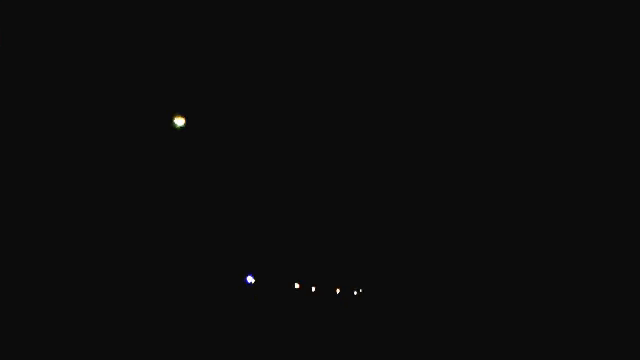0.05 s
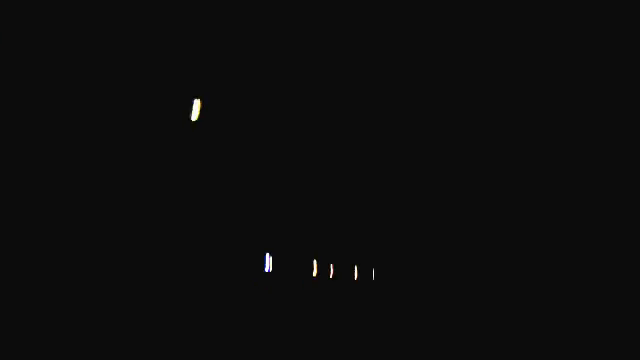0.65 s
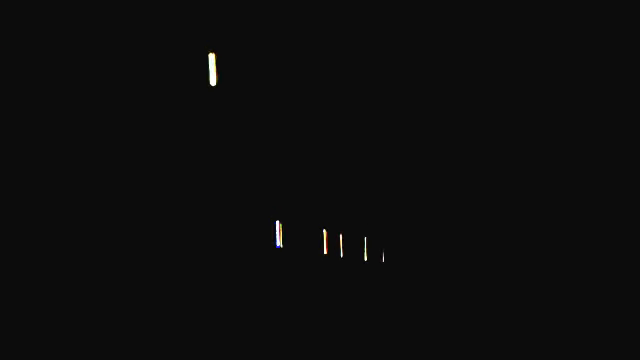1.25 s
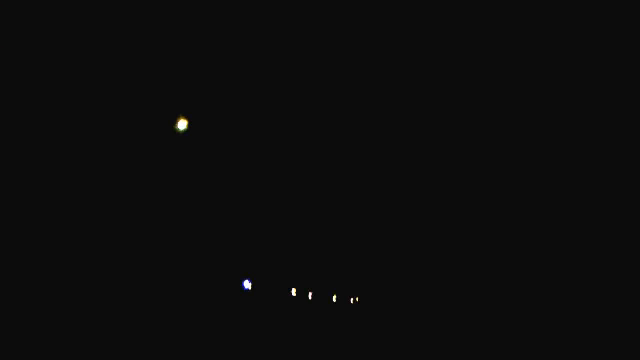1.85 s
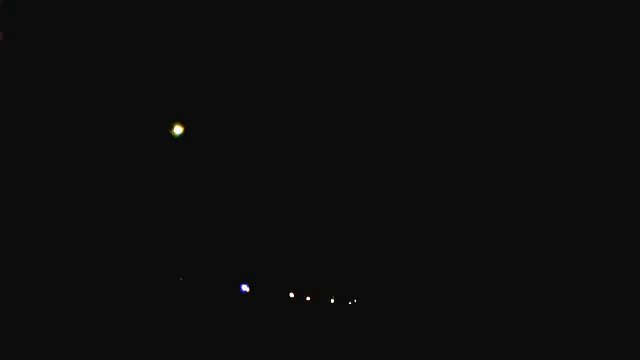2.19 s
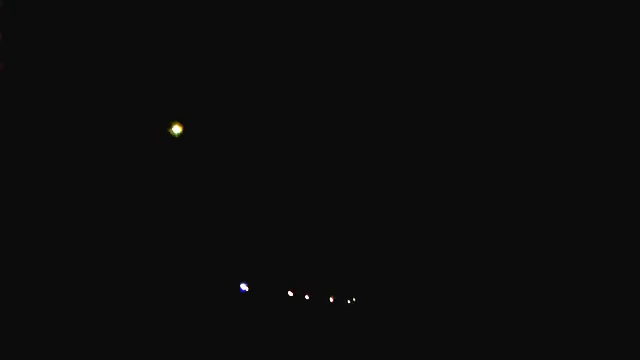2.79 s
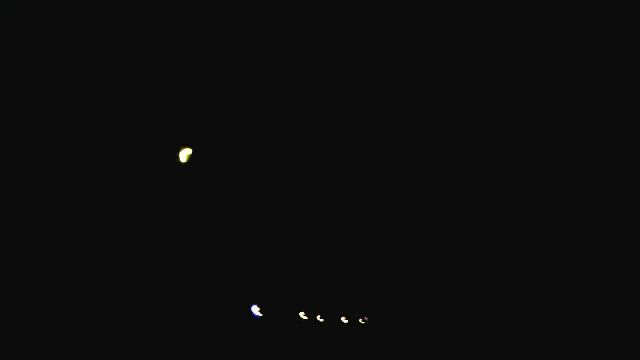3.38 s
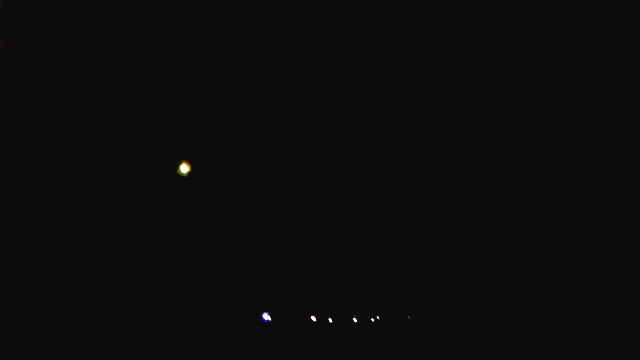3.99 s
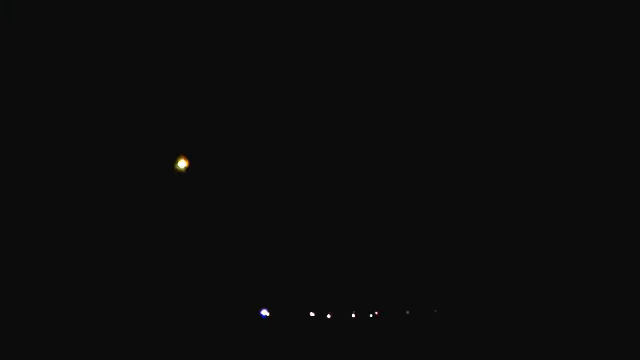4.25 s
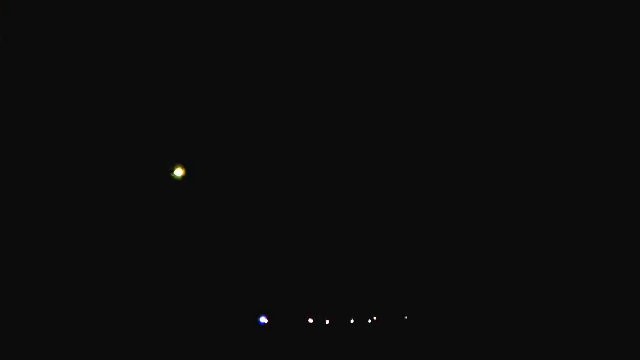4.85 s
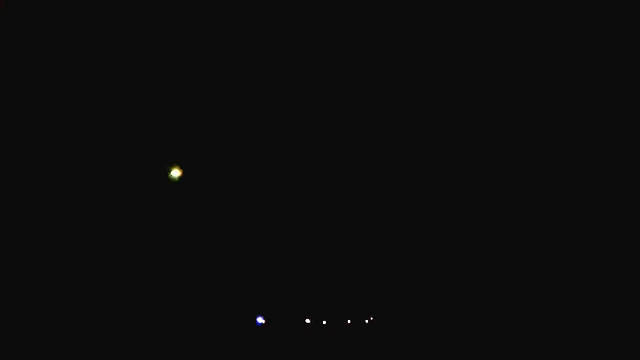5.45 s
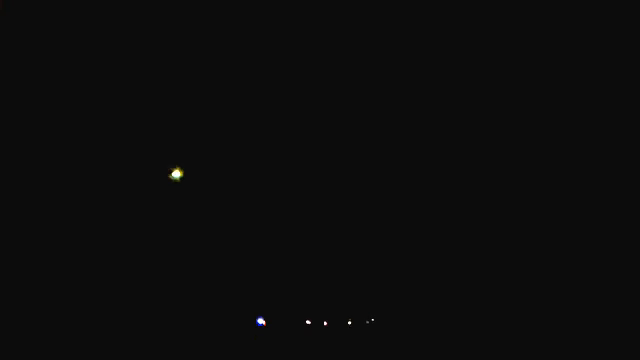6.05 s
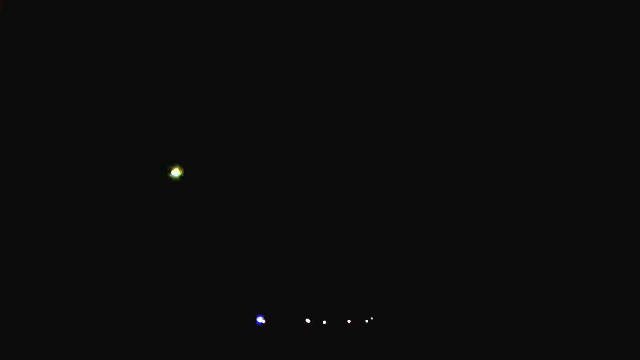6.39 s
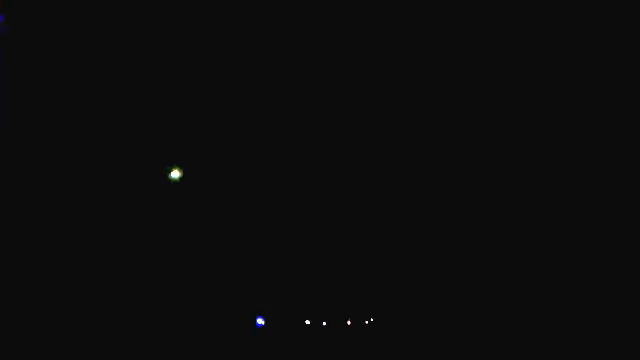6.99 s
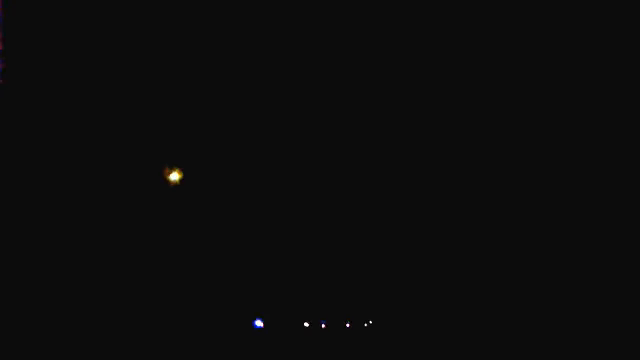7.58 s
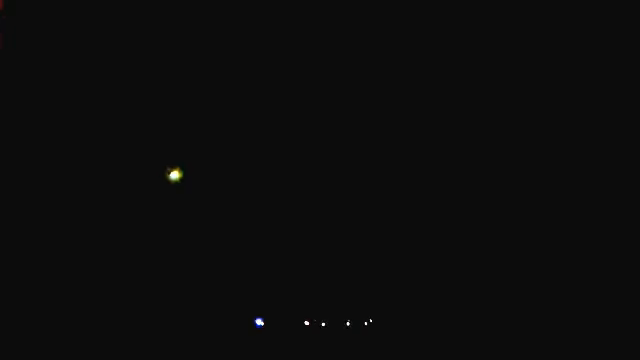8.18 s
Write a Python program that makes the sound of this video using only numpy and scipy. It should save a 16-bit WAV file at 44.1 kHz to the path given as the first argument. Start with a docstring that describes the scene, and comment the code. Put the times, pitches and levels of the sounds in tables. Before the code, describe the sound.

A distant cannon fires two quick rounds at night, with sharp cracks, booms and long rolling echoes, after some microphone handling knocks.

```python
"""Distant cannon at night

A cannon fires two quick rounds over a town, heard through a hand-held camera that knocks and rustles.
The sharp shock cracks of the flying shells arrive first, then the two blasts from the muzzle, then the
shells bursting far away. Walls and hills send the pair back again and again in a long roll.
Under it all, air rumbles on the microphone with a faint hiss."""
import sys
import numpy as np
from scipy import signal
from scipy.fft import rfft, irfft, next_fast_len
from scipy.io import wavfile

SR = 44100
rng = np.random.default_rng(int(sys.argv[2]) if len(sys.argv) > 2 else 0)


def wav_out(sig):
    """Save sig, one row per channel (or a flat mono array), as 16-bit PCM at SR to the path in sys.argv[1]."""
    wavfile.write(sys.argv[1], SR, np.round(np.clip(np.atleast_2d(sig).T, -1, 1) * 32767).astype(np.int16))


N = 362943
TIME = np.arange(N) / SR
CUTOFF_HZ = 15850
PULSE_SIZE = 8192   # samples in one short sound


def from_db(db):
    """Turn decibels into a number to multiply by."""
    return 10 ** (np.asarray(db) / 20)


def rms_one(x):
    """Scale a sound so that its average strength (rms) is 1."""
    return x / np.sqrt(np.mean(x ** 2) + 1e-20)


def level_curve(rows):
    """A volume curve that joins (time [s], level [dB]) points."""
    times, levels = np.transpose(rows)
    return from_db(np.interp(TIME, times, levels))


def colour(points, size):
    """Tone colour: how strong each frequency is. It falls away below 20 Hz."""
    hz, db = np.transpose(points)
    f = np.fft.rfftfreq(size, 1 / SR) + 1
    return from_db(np.interp(np.log(f), np.log(hz), db)) * f ** 2 / (f ** 2 + 20 ** 2)


def keep(x, hz, kind, order=2):
    """Filter a sound, keeping its "low" part, its "high" part or a "band"."""
    sections = signal.butter(order, np.minimum(hz, CUTOFF_HZ), kind, fs=SR, output="sos")
    return signal.sosfilt(sections, x)


def tint(x, points):
    """Give a noise a tone colour and a strength of 1."""
    size = next_fast_len(N)
    return rms_one(irfft(rfft(x, size) * colour(points, size), size)[:N])


def grains(spread_db):
    """Grainy noise: countless small arrivals whose strength changes every few milliseconds."""
    knots = TIME[::128]
    noise = rng.standard_normal(N)
    return noise * from_db(spread_db * np.interp(TIME, knots, rng.standard_normal(len(knots))))


def delayed(x, s):
    """The same sound, s seconds later."""
    return np.pad(x, (max(round(s * SR), 0), 0))[:len(x)]


def smear(x, hz):
    """Make the frequencies below hz trail behind, without changing their strength."""
    poles = signal.butter(2, hz, fs=SR)[1]
    return signal.lfilter(poles[::-1], poles, x)


def pulse(points, smear_hz):
    """One push of air, of height 1, with the given tone colour."""
    cepstrum = irfft(np.log(colour(points, PULSE_SIZE)))
    # folding onto the first half packs the sound at its start (minimum phase)
    cepstrum[1:PULSE_SIZE // 2] *= 2
    cepstrum[PULSE_SIZE // 2 + 1:] = 0
    wave = smear(irfft(np.exp(rfft(cepstrum))), smear_hz)
    return wave / np.abs(wave).max()


def ringing(rows):
    """The tones of a struck object; each drops 60 dB in its fade time, t60."""
    age = TIME[:PULSE_SIZE]
    return sum(from_db(db - 60 * age / t60) * np.sin(2 * np.pi * hz * age) for hz, db, t60 in rows)


def play(wave, rows):
    """Play a short wave at each (time [s], level [dB])."""
    out = np.zeros(N + len(wave))
    for s, db in rows:
        start = round(s * SR)
        out[start:start + len(wave)] += from_db(db) * wave
    return out[:N]


def tail(rows, rise_s, fade_s):
    """A volume curve that rises after each (time [s], level [dB]) and drops 60 dB in fade_s."""
    age = TIME[:int(2 * fade_s * SR)]
    shape = (1 - np.exp(-age / rise_s)) * from_db(-60 * age / fade_s)
    return np.sqrt(play(shape ** 2, [(s, 2 * db) for s, db in rows]))   # overlaps add in power


def swells(rows):
    """A volume curve that swells and fades around each (time [s], half length [s], level [dB])."""
    return sum(from_db(db) / (1 + ((TIME - s) / half) ** 2) ** 2 for s, half, db in rows)


# tone of the night air: (frequency [Hz], level [dB])
NIGHT_COLOUR = [(12, -58), (20, 1), (76, 3.5), (140, -8), (175, -6.5), (238, -18), (416, -22), (505, -18),
                (565, -25), (631, -24), (686, -28.5), (1270, -35), (2030, -40), (9660, -41), (15500, -47)]
# rise and fall of the rumble: (time [s], relative level [dB])
RUMBLE_LEVEL = [(0.0, -57), (0.33, -51), (3.02, -52.5), (3.28, -56.5), (3.8, -57)]
# the hiss, which sinks under the gunfire and returns: (time [s], level [dB])
HISS_LEVEL = [(1.6, -57.5), (2.8, -60), (3.9, -59), (4.9, -71), (5.3, -69.5), (6.2, -58)]


def night_air():
    """Air on the microphone makes a low, lumpy rumble under a faint hiss."""
    rumble = rms_one(keep(tint(grains(spread_db=3.5), NIGHT_COLOUR), 286, "low", order=3))
    hiss = rms_one(keep(tint(rng.standard_normal(N), NIGHT_COLOUR), 251, "high", order=3))
    return from_db(2) * level_curve(RUMBLE_LEVEL) * rumble + level_curve(HISS_LEVEL) * hiss


# light ticks of the camera case: (time [s], relative level [dB])
TICKS = [(.112, -37.5), (.127, -42), (.612, -58), (.699, -47), (.883, -44), (1.440, -35.5), (1.664, -39),
         (1.773, -41), (2.130, -40.5), (2.5325, -37.5), (3.571, -49)]
# tone of a tick: (frequency [Hz], level [dB])
TICK_COLOUR = [(400, -20), (750, 2), (1050, 5.5), (2000, -3.5), (3000, -9), (4900, -3), (7000, -25),
               (15000, -28)]


def camera_ticks():
    """The case ticks in the hand, each time a tiny puff of noise."""
    return from_db(-4) * tail(TICKS, rise_s=0.00018, fade_s=0.028) * tint(grains(1), TICK_COLOUR)


# knocks on the camera, with relative levels: (time [s], click [dB], clack [dB], thump [dB])
KNOCKS = [(0.2317, -8, -18.5, -23.5), (0.408, -37, -52, -30.5), (.465, -41, -47, -38.5),
          (1.004, -41.5, -43, -34), (1.179, -16, -15, -27.5), (1.5002, -26.5, -51, -46),
          (1.515, -33, -42, -30), (1.5472, -28.5, -35, -47), (2.012, -56, -52, -32.5),
          (2.532, -30.5, -48, -21), (2.909, -58, -55, -35)]
# ringing tones of the case: (frequency [Hz], level [dB], fade time [s])
CASE_TONES = [(1360, -38, 0.013), (4330, -27, .010), (4750, -23, 0.0069), (13200, -19, .003)]
# rubs of hand and sleeve: (middle time [s], half length [s], level [dB])
RUBS = [(.278, 0.015, -37), (.318, 0.03, -43.5), (.41, 0.012, -45), (.624, .019, -53.5), (.987, 0.12, -61),
        (1.177, 0.0077, -35), (1.485, 0.078, -49.5), (1.706, 0.16, -61.5), (2.137, .02, -60),
        (2.362, .08, -56), (4.122, .008, -49), (4.29, 0.02, -38), (5.493, 0.094, -57.5)]
# tones of the bright click, hollow clack, deep thump and rub: (frequency [Hz], level [dB])
CLICK_COLOUR = [(200, 0), (700, -5), (1100, -9.5), (1900, -26), (3000, 6), (4000, -1.5), (5200, 4.5),
                (7000, -6), (9000, -6), (11000, -12.5), (15000, -23)]
CLACK_COLOUR = [(100, -18), (215, 7.5), (300, -4.5), (390, 1), (500, -17), (660, -2), (850, -3.5),
                (1050, -16), (1380, -10.5), (2000, -18.5), (6000, -30)]
THUMP_COLOUR = [(25, -5), (60, 1.5), (140, 4.5), (200, -10.5), (300, -12), (420, -23.5), (1500, -74)]
RUB_COLOUR = [(200, 1), (450, -5.5), (750, 2), (1100, -12), (1550, -2.5), (2200, -7), (3000, -2),
              (3700, -4.5), (4700, 1), (7000, -8), (10000, -13.5), (15000, -19.5)]


def camera_handling():
    """Each knock clicks and clacks in the case and thumps the microphone; rubs swell and fade."""
    clicks, clacks, thumps = ([(row[0], row[k]) for row in KNOCKS] for k in (1, 2, 3))
    click = play(pulse(CLICK_COLOUR, smear_hz=3020) + ringing(CASE_TONES), clicks)
    buzz = tail(clicks, rise_s=0.00025, fade_s=0.017) * tint(grains(0.83), CLICK_COLOUR)
    clack = play(pulse(CLACK_COLOUR, smear_hz=800), clacks)
    thump = play(pulse(THUMP_COLOUR, smear_hz=173), thumps)
    slide = from_db(-28) * tail(clicks, rise_s=0.0015, fade_s=0.13)   # the hand slides on after a knock
    rubbing = (swells(RUBS) + slide) * tint(grains(spread_db=3), RUB_COLOUR)
    return from_db(-0.5) * click + from_db(-12.5) * buzz + clack + thump + rubbing


# the two shock cracks: (time [s], relative level [dB])
CRACKS = [(3.8436, 0.5), (3.9181, -1.5)]
# nearby walls that throw the cracks back: (delay [s], level [dB])
WALLS = [(.012, -6.5), (.0185, -13), (.0385, -6.5), (.051, -18), (.0705, -8), (.0765, -14), (.141, -16)]
# metal that rings as each crack passes: (frequency [Hz], relative level [dB], fade time [s])
METAL_TONES = [(2810, -18, 0.039), (3270, -23.5, 0.016), (3960, -18, 0.016), (3980, -27, 0.0091)]
# tones of a crack, its scatter off houses and its echo in the streets: (frequency [Hz], level [dB])
CRACK_COLOUR = [(40, -32), (100, -17), (220, -4.5), (350, -4.5), (560, 0.5), (850, -12), (1170, -7.5),
                (2000, -21), (2900, -17), (4000, -27.5), (5000, -41), (7000, -38), (11000, -68),
                (15000, -76)]
SCATTER_COLOUR = [(40, -26), (100, -9), (200, -1), (380, 0), (570, -3.5), (850, -16.5), (1250, -13),
                  (2100, -24), (2900, -22), (4000, -28), (5500, -33), (8000, -44.5), (11000, -59),
                  (15000, -71)]
STREET_COLOUR = [(24, -61), (40, -19), (86, -22), (101, -10), (120, -16), (257, -4.5), (327, -5),
                 (552, -0.5), (622, -4.5), (1000, -8.5), (1340, -6), (2260, -19.5), (3390, -23.5),
                 (4200, -34.5), (12000, -72), (15600, -100), (22000, -120)]


def shock_cracks(rear_shock_s=0.001586, metal_delay_s=0.034):
    """Each shell trails a front and a rear shock wave, which bounce off walls and through the streets."""
    metal = keep(ringing(METAL_TONES), 5500, "low", order=4)
    shock = pulse(CRACK_COLOUR, smear_hz=700) + from_db(3.5) * delayed(metal, metal_delay_s)
    crack = shock + from_db(-4) * delayed(shock, rear_shock_s)
    near = crack + sum(from_db(db) * delayed(keep(crack, 2100, "low"), s) for s, db in WALLS)
    # both cracks meet the same house fronts, so the scattered pattern repeats
    houses = grains(spread_db=3)
    houses = houses + from_db(-2.5) * delayed(houses, CRACKS[1][0] - CRACKS[0][0])
    houses = houses + from_db(-14.5) * delayed(houses, rear_shock_s)
    scatter = tail(CRACKS, rise_s=0.0035, fade_s=0.5) * tint(houses, SCATTER_COLOUR)
    streets = tail(CRACKS, rise_s=0.045, fade_s=5.86) * tint(grains(spread_db=3), STREET_COLOUR)
    streets *= level_curve([(4.45, 3), (4.8, -5.5), (5.4, -52)])   # fades early, under the blasts
    return from_db(-1) * play(near, CRACKS) + from_db(-14.5) * scatter + from_db(-30) * streets


# the two muzzle blasts: (time [s], relative level [dB])
BLASTS = [(4.4757, 0.5), (4.563, 0)]
# a wall echo of the second blast: (time [s], relative level [dB])
WALL_ECHO = [(4.5696, -4)]
# far echoes; small surfaces return only the highs: (time [s], relative level [dB], band centre [Hz])
FAR_ECHOES = [(4.676, -12, 1610), (4.699, -8.5, 1700), (4.821, -16.5, 900), (5.228, -20, 1530),
              (5.383, -18.5, 900), (5.636, -14.5, 1920), (5.842, -21, 1290), (6.317, -17, 2200),
              (6.353, -10, 375), (6.391, -18.5, 2600), (6.465, -23.5, 2820), (6.715, -21.5, 990),
              (7.643, -9, 600), (8.083, -22, 1300)]
# tones of a blast and of the boom after it: (frequency [Hz], level [dB])
BLAST_COLOUR = [(35, -21), (70, -11.5), (130, 2), (200, -2.5), (300, 3), (460, -29), (720, -12.5),
                (1400, -14.5), (2000, -25), (2800, -24), (4700, -31), (6000, -40.5), (9000, -49.5),
                (13000, -93)]
BOOM_COLOUR = [(30, -21), (70, -12.5), (105, -4), (150, -3.5), (240, -9.5), (380, -21), (650, -22.5),
               (1500, -42), (3000, -38), (6000, -54.5), (12000, -84)]


def muzzle_blasts(ground_delay_s=0.001466, flutter_band_hz=(94, 112), band_ratio=1.73):
    """Each blast bounces off the ground and booms; far slopes return the pair thinner and duller."""
    front = pulse(BLAST_COLOUR, smear_hz=270)
    for fray_hz in (1320, 1520, 2710, 4500):   # swirling air frays the steep front of the wave
        front = smear(front, fray_hz)
    blast = from_db(-1.5) * (front + from_db(-7) * delayed(front, ground_delay_s))
    out = play(blast, BLASTS) + play(keep(blast, 2700, "low"), WALL_ECHO)
    far_blast = keep(blast, 4500, "low", order=6)   # the long path soaks up the highs
    for arrival, db, centre_hz in FAR_ECHOES:
        # rough ground draws the echo out
        ground = from_db(-25 - 60 * TIME[:PULSE_SIZE] / 0.072) * rng.standard_normal(PULSE_SIZE)
        echo = far_blast + signal.fftconvolve(far_blast, ground)[:PULSE_SIZE]
        echo = keep(keep(echo, centre_hz / band_ratio, "high"), centre_hz * band_ratio, "low")
        pair = [(arrival + s - BLASTS[0][0], db + blast_db) for s, blast_db in BLASTS]
        out += from_db(-3) * play(echo, pair)
    boom = tail(BLASTS, rise_s=0.0019, fade_s=0.99) * tint(grains(spread_db=2.1), BOOM_COLOUR)
    # the bass flutters between the house fronts
    flutter = rms_one(keep(rng.standard_normal(N), flutter_band_hz, "band"))
    flutter *= tail(BLASTS, rise_s=0.047, fade_s=0.95)
    return out + from_db(-20) * boom + from_db(-22.5) * flutter


# tone of the rolling echoes: (frequency [Hz], level [dB])
ROLL_COLOUR = [(30, -3.5), (70, 5), (150, 1), (205, -3), (270, 1.5), (400, -3.5), (520, 0), (700, -4.5),
               (950, -10.5), (1150, -11), (2050, -20), (2500, -21), (4000, -32), (12000, -78)]


def paired_echoes(spread_db):
    """The landscape scatters both blasts, so every small echo comes twice."""
    echoes = grains(spread_db)
    return tint(echoes + from_db(-0.5) * delayed(echoes, BLASTS[1][0] - BLASTS[0][0]), ROLL_COLOUR)


# rise and fall of the roll: (time [s], relative level [dB])
ROLL_LEVEL = [(5.3, -37), (5.42, -36.5), (5.98, -37.5), (6.33, -36.5), (7.58, -35.5), (7.83, -38),
              (8.09, -37.5), (8.23, -36)]
# lows, middle and highs of the roll: (relative starting level [dB], change [dB per s])
ROLL_BANDS = [(-6.5, 1), (-0.5, -0.19), (-12, -4)]
# swells from broad hillsides: (middle time [s], half length [s], level [dB], band centre [Hz])
HILLSIDES = [(4.677, 0.12, -23.5, 90), (5.136, 0.14, -31, 120), (5.49, 0.13, -45.5, 3240),
             (6.785, 0.1, -49.5, 3180), (7.038, 0.1, -50.5, 3200), (7.413, 0.15, -32, 220),
             (7.718, 0.098, -48, 2830)]


def echo_roll(build_s=0.049, build_delay_s=0.064, band_ratio=2.14):
    """A long roll follows the blasts and swells off each hill; later echoes travel farther, so duller."""
    town, hills = paired_echoes(spread_db=3.5), paired_echoes(spread_db=5)
    bands = [keep(town, hz, kind, order=4)
             for hz, kind in ((220, "low"), ((220, 1600), "band"), (1600, "high"))]
    age = np.maximum(TIME - BLASTS[0][0] - build_delay_s, 0)
    roll = sum(from_db(db + db_per_s * age) * rms_one(band)
               for (db, db_per_s), band in zip(ROLL_BANDS, bands))
    roll *= (1 - np.exp(-age / build_s)) * level_curve(ROLL_LEVEL)
    for s, half, db, hz in HILLSIDES:
        hillside = rms_one(keep(hills, (hz / band_ratio, hz * band_ratio), "band"))
        roll += (age > 0) * swells([(s, half, db)]) * hillside
    return roll


# the two shell bursts: (time [s], relative level [dB])
BURSTS = [(5.0138, -6.5), (5.0532, 0.5)]
# tone of a burst: (frequency [Hz], level [dB])
BURST_COLOUR = [(40, -16), (120, -10), (240, 2.5), (400, -14), (580, -5), (950, -31), (1400, -19.5),
                (2100, -31), (3200, -33), (5000, -52), (9000, -73), (15000, -96)]


def shell_bursts():
    """The shells explode far off: a brief crackle, a dull bang and a short rumble each."""
    bang = play(pulse(BURST_COLOUR, smear_hz=330), BURSTS)
    rumble = tail(BURSTS, rise_s=0.001, fade_s=0.57) * tint(grains(spread_db=0.5), BURST_COLOUR)
    grit = rms_one(keep(tint(grains(spread_db=4.5), SCATTER_COLOUR), 670, "high"))
    crackle = tail(BURSTS, rise_s=0.00085, fade_s=0.09) * grit
    return from_db(-6.5) * bang + from_db(-20) * rumble + from_db(-29) * crackle


def scene(hollow_delay_s=0.003645):
    """Mix it all; a faint copy a few milliseconds later gives the gunfire a slightly hollow tone."""
    gunfire = shock_cracks() + muzzle_blasts() + shell_bursts() + echo_roll()
    hollow_tone = from_db(-20) * delayed(keep(gunfire, 810, "high"), hollow_delay_s)
    return (gunfire + hollow_tone + camera_ticks() + camera_handling() + night_air())[None]


def record(dry, ceiling=0.92):
    """Round off the loudest peaks and cut the very highest frequencies."""
    rounded = dry / (1 + (dry / ceiling) ** 6) ** (1 / 6)
    return signal.sosfilt(signal.ellip(10, 0.1, 80, CUTOFF_HZ, fs=SR, output="sos"), rounded)


dry = scene()
out = record(dry)
wav_out(out)
```